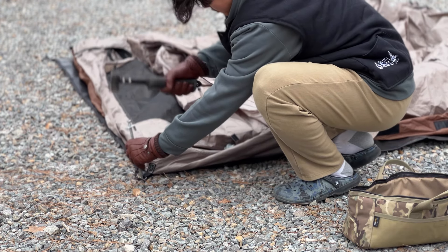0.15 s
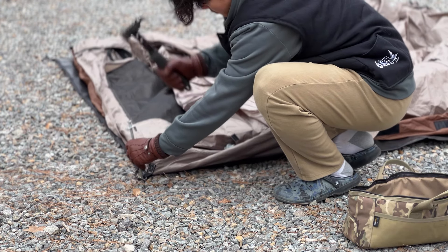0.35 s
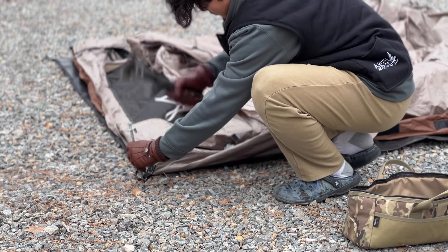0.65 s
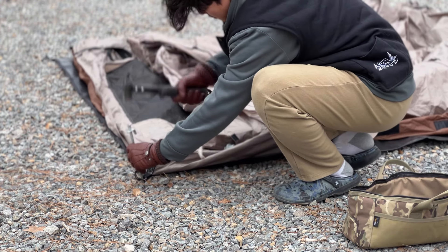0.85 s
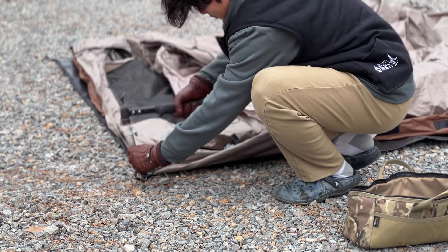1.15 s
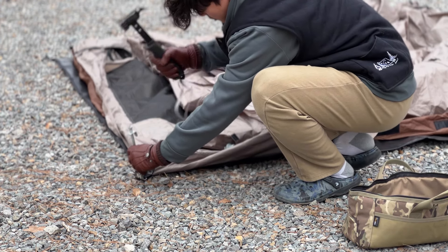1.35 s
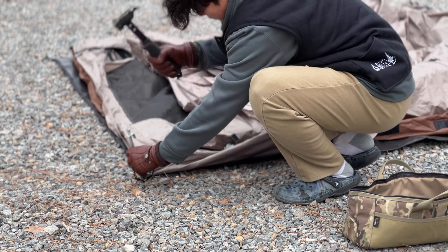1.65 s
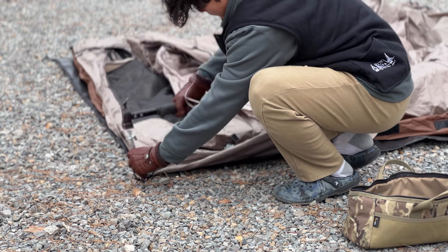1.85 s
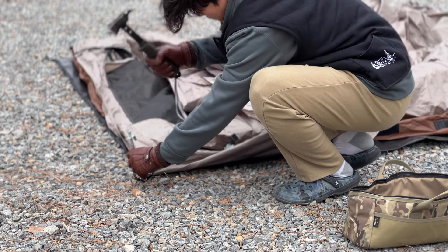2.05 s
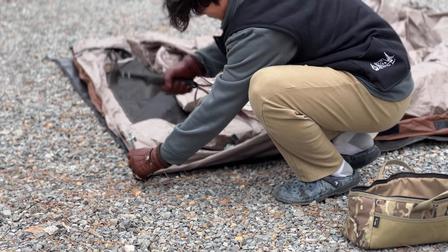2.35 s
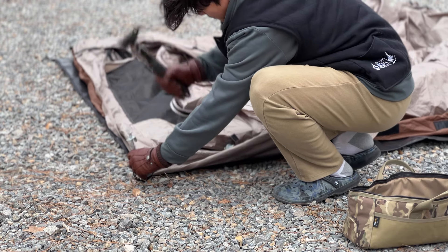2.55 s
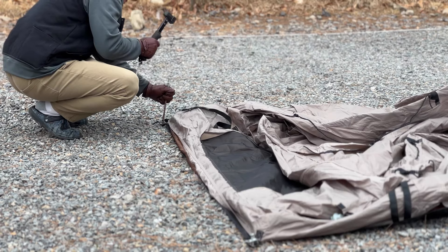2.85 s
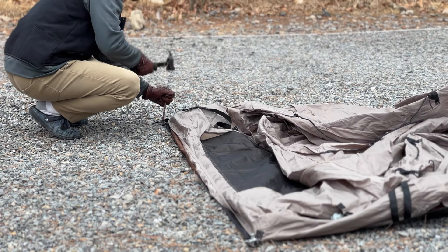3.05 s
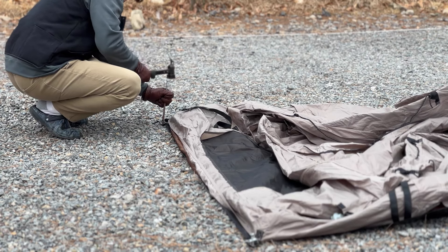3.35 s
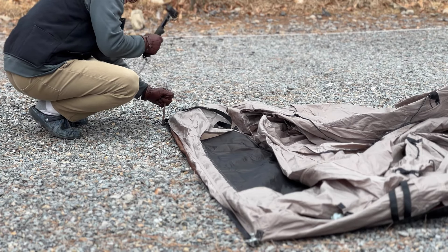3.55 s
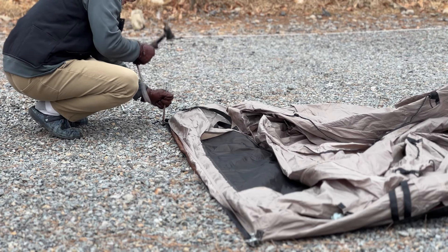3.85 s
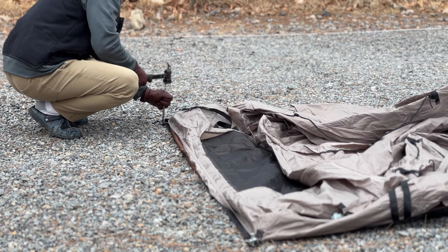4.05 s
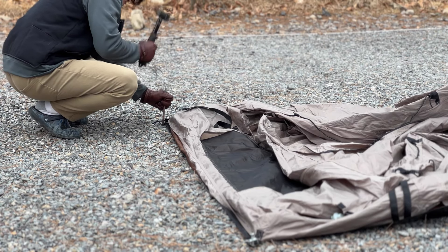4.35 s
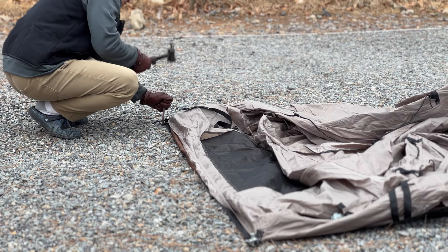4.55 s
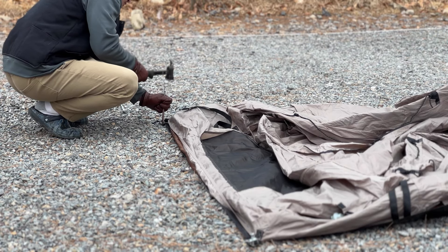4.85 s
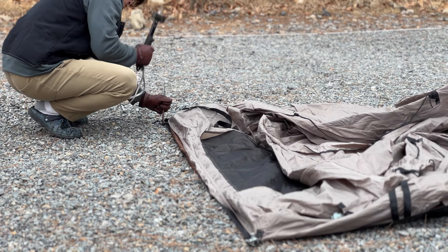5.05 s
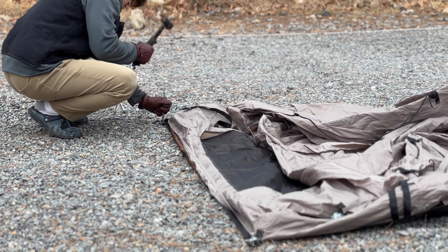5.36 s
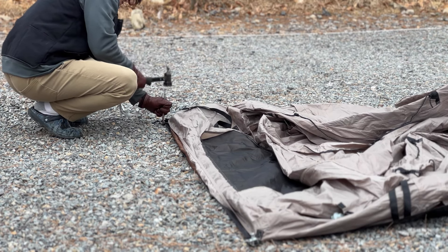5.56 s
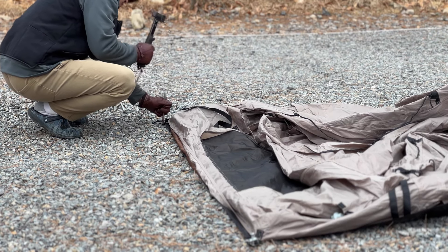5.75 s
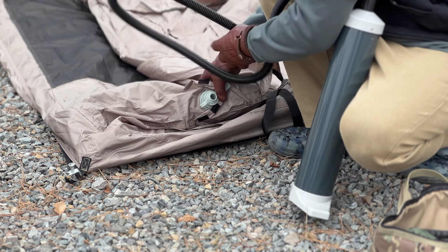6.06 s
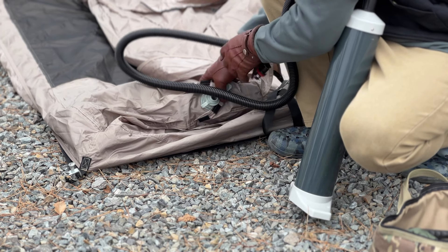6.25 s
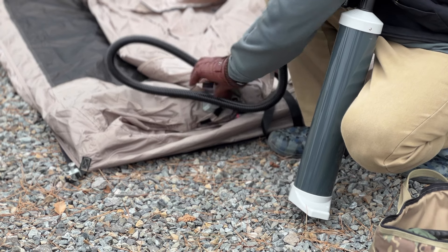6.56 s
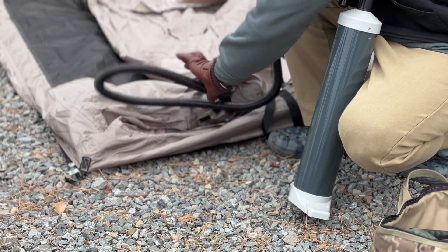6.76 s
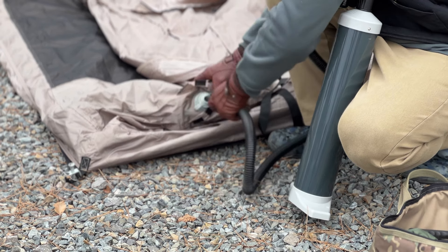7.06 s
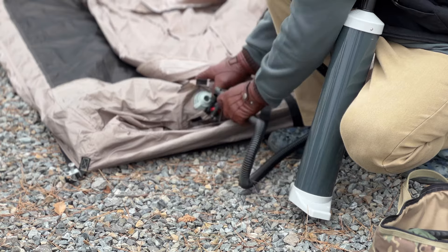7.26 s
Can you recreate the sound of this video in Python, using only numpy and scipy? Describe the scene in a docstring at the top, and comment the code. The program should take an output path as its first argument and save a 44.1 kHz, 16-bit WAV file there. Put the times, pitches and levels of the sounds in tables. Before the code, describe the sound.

Outdoors, sharp metallic hammer strikes on a tent peg repeat about every third of a second, then stop abruptly for crinkling cloth and hose ticks.

```python
"""Open gravel near a wall and trees: a hammer drives a steel tent peg in two shots, hard-cut together;
in a third shot a ribbed pump hose is handled on tent cloth.
Blows are shaped noise and damped sines, with the head's ring, a ground thud and noise echoes.
Cloth is random snaps, filtered noise and ticks; wind is filtered noise and single pressure swings.
Far birds are gliding sines and rough pulse trains; wind and air run on through all three shots."""
import sys
import numpy as np
from scipy import signal
from scipy.fft import rfft, irfft
from scipy.io import wavfile
from scipy.ndimage import uniform_filter1d

SR = 44100
rng = np.random.default_rng(int(sys.argv[2]) if len(sys.argv) > 2 else 0)


def log_audio(samples):
    """Write samples as a 16-bit WAV file to the path given in sys.argv[1]."""
    # one column per channel
    frames = np.atleast_2d(samples).T
    # limit to full scale, then quantise
    limited = np.clip(frames, -1, 1)
    pcm = np.round(limited * 32767).astype(np.int16)
    wavfile.write(sys.argv[1], SR, pcm)


N = 326781

# All dB in the tables are relative: mix levels and filters act later.
# Hard cuts between the shots. Each entry: time in seconds.
CUTS_S = [2.688, 5.95]

# Open air and port spectra. Each row: frequency in Hz, density in dB per Hz.
AIR_SPECTRUM = [(30, 3.5), (100, 1.5), (300, -7), (700, -7.5), (1400, -18.5), (3000, -28), (6000, -46.5),
                (10000, -44.5), (16000, -49.5)]
# Phase lead of the left microphone port over the right. Each row: frequency in Hz, lead in radians.
PORT_LEAD = [(30, 0), (1900, 0.05), (3200, 0.68), (6400, 0.15), (8300, 0.45), (9300, -1.9), (10300, -3.2),
             (12000, -6.2), (13800, -9.4), (15500, -12.5)]

# Whistles of small birds. Each row: start in seconds, length in seconds, start pitch in Hz,
# end pitch in Hz, level in dB.
WHISTLES = [(0.452, 0.3, 1647, 1557, -84), (3.222, 0.061, 7000, 6460, -89), (3.408, 0.073, 4000, 3680, -79),
            (3.609, 0.07, 4350, 3570, -85.5), (3.95, 0.072, 2630, 2530, -88.5),
            (4.379, 0.096, 2600, 2555, -88), (4.731, 0.093, 2600, 2530, -87),
            (5.085, 0.11, 2570, 2560, -83.5), (5.755, 0.07, 4210, 3580, -88.5),
            (5.783, 0.09, 2564, 2630, -87.5), (6.394, 0.13, 4940, 4560, -89),
            (6.486, 0.06, 8600, 7100, -89)]
# Harsh calls of a far bird. Each row: start in seconds, length in seconds, start pitch in Hz,
# top of the pitch arch in Hz, level in dB, roughness 0-1, power that lifts the upper harmonics.
CAWS = [(2.943, 0.046, 706, 1150, -68, 0.38, 2.4), (4.241, .035, 944, 1070, -68, 0.42, 2.4),
        (5.287, 0.045, 736, 866, -67, 0.4, 1.0), (5.319, 0.063, 697, 767, -59.5, 0.31, 0.25),
        (5.392, 0.064, 613, 660, -68, 0.3, 0.082)]
# Throat of the far bird. Each row: frequency in Hz, gain in dB.
THROAT = [(500, -12), (760, -3), (1050, -14), (1400, -7), (1850, -12), (2300, 2), (2700, -11), (3600, -23),
          (4250, -16), (5000, -36)]

# Wind rumble spectrum. Each row: frequency in Hz, density in dB per Hz.
RUMBLE_SPECTRUM = [(15, -45), (25, -23), (35, -14), (50, -2), (70, 0), (110, -3), (180, -16), (300, -26.5),
                   (700, -52), (2000, -93.5)]
# Strength of the breeze. Each row: time in seconds, rumble in dB.
BREEZE = [(0, -65), (.45, -62.5), (.9, -54.5), (2.5, -55.5), (2.8, -52), (4.4, -53), (5.3, -47.5),
          (5.8, -51.5), (6.3, -46.5), (6.9, -54.5), (7.41, -44.5)]
# Gusts that swell the rumble. Each row: middle in seconds, rumble in dB.
GUSTS = [(2.14, -38), (2.301, -45.5), (2.8, -43.5), (3.069, -38.5), (3.25, -41.5), (3.58, -43.5),
         (3.849, -40.5), (4.61, -40.5), (4.94, -37.5), (6.55, -44), (7.029, -45)]
# Spells full of small eddies. Each row: start in seconds, length in seconds, flutter in dB.
SPELLS = [(2.7, 0.86, -53.5), (3.965, 0.29, -51), (4.763, 0.85, -54), (5.953, 0.48, -51.5),
          (6.662, 0.17, -55), (7.128, 0.17, -46.5)]
# Single strong buffets. Each row: middle in seconds, peak in dB, frequency in Hz.
BUFFETS = [(2.309, -35, 236), (2.722, -39, 525), (2.85, -41.5, 490), (3.231, -34.5, 216),
           (3.275, -40.5, 530), (3.409, -40, 495), (3.553, -34.5, 407), (3.569, -32.5, 180),
           (3.831, -28, 211), (3.856, -39, 370), (4.117, -39, 443), (4.594, -35, 187), (4.903, -26.5, 262),
           (4.941, -32.5, 158), (5.13, -30.5, 580), (5.287, -31, 171), (5.647, -35.5, 203),
           (5.97, -37, 620), (6.23, -32.5, 433), (6.436, -38.5, 590), (6.715, -37, 473),
           (6.866, -41.5, 595), (7.149, -37, 416), (7.305, -37, 554)]
GUST_WIDTH_S, SPELL_RISE_S, SPELL_FALL_S = 0.035, 0.01, 0.055
# Small eddies outgrow the rumble: EDDY_DB at a breeze of BREEZE_REF_DB, growth in dB per dB of breeze.
BREEZE_REF_DB, EDDY_DB, EDDY_GROWTH = -50, -61, 1.5

# Spectra of crinkle and ticks, and of the weave's swish. Each row: frequency in Hz, density in dB per Hz.
CLOTH_SPECTRUM = [(400, 8), (1200, 4), (3200, 6), (4500, 1), (7500, -0.5), (9500, -8), (12000, -7.5),
                  (16000, -17)]
SWISH_SPECTRUM = [(2000, -22), (6000, -8.5), (9500, -4.5), (11500, -0.5), (13000, -7), (16000, -10)]
# Moves of the hands over the cloth. Each row: start in seconds, length in seconds, crinkle in dB, swish in dB.
MOVES = [(6.163, 0.07, -70.5, -71), (6.286, 0.047, -67.5, -83), (6.555, 0.056, -72, -80),
         (6.661, .08, -77.5, -89), (6.956, 0.094, -74, -62), (7.068, 0.13, -69, -81),
         (7.326, 0.027, -72, -69.5)]
# Ticks of the ribbed hose against the cloth. Each row: start in seconds, level in dB.
SCUFFS = [(5.989, -63.5), (6.0543, -59.5), (6.096, -69), (6.2113, -55.5), (6.308, -60.5), (6.376, -62.5),
          (6.405, -62), (6.4515, -58.5), (6.592, -57.5), (6.787, -58), (6.7988, -55), (6.973, -53),
          (6.995, -55), (7.1318, -53.5), (7.363, -56)]
MOVE_RISE_S, MOVE_FALL_S, SCUFF_T60_S = 0.014, 0.013, 0.035
RESTING_DB = -78.5  # crinkle between moves

# Hammer blows. Each row: start in seconds, crack in dB, crack treble in dB, peg in dB, ground thud in dB,
# low ring in dB, high ring in dB, knock in Hz, looseness of grip as a factor on the low ring's length.
BLOWS = [(-0.011, -39, -41.5, -41.5, -49.5, -36, -63, 1600, 0.87),
         (0.3084, -33.5, -39, -37, -42, -38, -40.5, 2710, 0.89),
         (0.672, -33.5, -39.5, -37.5, -37, -32, -41.5, 2770, 0.91),
         (1.05, -36, -38, -39, -35, -41, -45.5, 2830, 1.24),
         (1.408, -34.5, -37, -35, -38, -32, -40.5, 2600, 0.88),
         (1.7836, -36, -34.5, -31.5, -38, -38, -38.5, 1082, 0.94),
         (2.1437, -34, -38, -31.5, -33.5, -40, -54, 1134, 1.48),
         (2.4999, -35.5, -35.5, -30, -33.5, -37.5, -52.5, 1035, 1.43),
         (2.658, -38, -45.5, -41, -56, -69, -52, 1633, 0.82),
         (2.9942, -38.5, -45.5, -35.5, -43, -50, -50, 1750, 1.17),
         (3.3475, -39.5, -44.5, -43.5, -62, -64.5, -57.5, 2130, 2.6),
         (3.7196, -40, -43.5, -37, -43, -43, -39, 915, 0.85),
         (4.0759, -39, -40.5, -40, -44.5, -56.5, -46, 1733, 1.53),
         (4.4614, -40, -43, -41.5, -49, -50.5, -39.5, 1180, 1.04),
         (4.809, -40.5, -43, -40.5, -39.5, -45, -42, 1855, 0.8),
         (5.167, -41, -38.5, -37.5, -41, -43.5, -49.5, 1370, 0.88),
         (5.5287, -41, -39.5, -40.5, -42, -64, -46.5, 2230, 1.17),
         (5.886, -39.5, -41, -39.5, -40.5, -42.5, -52, 1824, 0.88)]
# Steel modes of the hammer head. Each row: frequency in Hz, level in dB, T60 in seconds,
# ring it follows (0 low, 1 high).
HAMMER_MODES = [(3510, -0.5, 0.29, 0), (3512, -19.5, .55, 0), (4890, -15.5, 0.16, 0), (10875, 4, 0.23, 1)]
# Modes of the peg, damped by glove and gravel. Each row: frequency in Hz, level in dB, T60 in seconds.
PEG_MODES = [(6442, 10, 0.016), (6770, -20.5, 0.03), (5980, -3.5, 0.033), (6350, -26.5, 0.033)]
# Spectra of the crack, its treble, the wall's slap and the trees' wash.
# Each row: frequency in Hz, density in dB per Hz.
CRACK_SPECTRUM = [(300, -26.5), (550, -4.5), (850, -3.5), (1500, -2.5), (2100, -1), (2800, 0), (4300, -5),
                  (5500, -5.5), (7000, -10.5), (9000, -40)]
TREBLE_SPECTRUM = [(4000, -35), (7000, 0.5), (8000, -4), (8800, 6), (10000, -2), (11000, -1), (12500, -7.5),
                   (13800, -4), (15400, -6), (16500, -22.5)]
WALL_SPECTRUM = [(500, -21.5), (2500, -17), (5000, -18), (6400, 9), (7300, -1), (8500, 0), (9800, -18),
                 (12000, -16.5), (16000, -27)]
TREES_SPECTRUM = [(200, -10), (1000, -11.5), (3000, -8), (4500, -6.5), (5800, -3.5), (6500, 7), (7000, -1),
                  (8600, 1), (9800, -9), (12000, -20), (15400, -15), (16500, -29.5)]
KNOCK_DB = -3.5  # re crack
LIFT_S, SOUND_M_PER_S = 0.09, 343  # time constant of the arm's lift; speed of sound
GROUND_DB = -20.5  # the ring's reflection in the gravel
FAR_ECHO_RATIO, FAR_ECHO_DB = 1.8, -6.5  # farther surface: delay and level re the wall's echo


def amp(db):
    """Decibels to gain."""
    return 10 ** (np.asarray(db) / 20)


def unit(x):
    """Scales to rms 1."""
    return x / np.sqrt(np.mean(x ** 2) + 1e-20)


def read(points, hz):
    """Interpolates a spectrum on a log-frequency axis."""
    f, value = np.transpose(points)
    return np.interp(np.log(hz + 1), np.log(f + 1), value)


def level(rows):
    """A dB curve as a gain for every sample."""
    return amp(np.interp(np.arange(N) / SR, *np.transpose(rows)))


def seconds(length_s):
    """Time axis of a short sound."""
    return np.arange(int(length_s * SR)) / SR


def add(mix, start_s, sound):
    """Mixes a sound in, trimming what lies outside the mix."""
    at = round(start_s * SR)
    sound = sound[max(-at, 0):]
    part = mix[max(at, 0):][:len(sound)]
    part += sound[:len(part)]


def colour(x, points, size=2048):
    """Causal minimum-phase filter with the given spectrum."""
    log_gain = np.log(amp(read(points, abs(np.fft.fftfreq(size, 1 / SR)))))
    taps = np.fft.ifft(np.exp(signal.hilbert(log_gain).conj())).real[:size // 2]
    return signal.oaconvolve(x, taps)[:len(x)]


def burst(x, db, length_s):
    """Gives a short sound the energy of an rms of db held for length_s."""
    return amp(db) * x * np.sqrt(length_s * SR / (np.sum(x ** 2) + 1e-20))


def held(start_s, length_s, rise_s, fall_s):
    """Envelope: linear rise, hold, exponential fall after length_s."""
    t = np.arange(N) / SR - start_s
    return np.clip(t / rise_s, 0, 1) * np.exp(-np.maximum(t - length_s, 0) / fall_s)


def puff(hz, cycles, order=6):
    """Pressure swing of about a cycle: a sine of random phase under a Gaussian, centred in order periods."""
    turns = hz * seconds(order / hz) - order / 2
    return np.exp(-(turns / cycles) ** 2) * np.sin(2 * np.pi * (turns + rng.random()))


def woods(x, t60_s, wet_db):
    """Trunks and branches scatter a thin, late tail: sparse noise taps that swell, then decay."""
    t = seconds(0.91)
    taps = rng.standard_normal(len(t)) * (rng.random(len(t)) < 5000 / SR)
    taps *= amp(-60 * t / t60_s) * (1 - np.exp(-t / 0.043))
    return amp(wet_db) * signal.oaconvolve(x, taps / np.linalg.norm(taps))[:N]


def air(db):
    """Steady hush of the open air: filtered noise."""
    return amp(db) * unit(colour(rng.standard_normal(N), AIR_SPECTRUM))


def whistles():
    """Thin whistles: sines gliding geometrically in pitch."""
    thin = np.zeros(N)
    for start_s, length_s, from_hz, to_hz, db in WHISTLES:
        hz = np.geomspace(from_hz, to_hz, int(length_s * SR))
        tone = np.sin(2 * np.pi * np.cumsum(hz) / SR)
        add(thin, start_s, amp(db) * unit(tone * signal.windows.tukey(len(hz), 0.6)))
    return thin


def caws():
    """Harsh calls: six harmonics on an arching, jittered pitch, roughened by noise, through a throat filter."""
    harsh = np.zeros(N)
    for start_s, length_s, from_hz, top_hz, db, rough, shrill in CAWS:
        hz = from_hz + (top_hz - from_hz) * np.sin(np.linspace(0, 2, int(length_s * SR)))
        jitter, rasp = rng.standard_normal((2, len(hz)))
        turns = np.cumsum(hz * (1 + rough * uniform_filter1d(jitter, size=120))) / SR
        pulses = unit(sum(k ** shrill * np.cos(2 * np.pi * k * turns) for k in range(1, 7)))
        call = colour(pulses * (1 + rough * rasp), THROAT)
        add(harsh, start_s, amp(db) * unit(call * signal.windows.tukey(len(hz), 0.6)))
    return harsh


def birds():
    """Whistles and harsh calls, blurred by the woods."""
    thin, harsh = whistles(), caws()
    return thin + woods(thin, 0.4, wet_db=-4) + harsh + woods(harsh, 0.6, wet_db=-2)


def wind_rumble(breeze):
    """Low noise whose swells follow breeze and gusts."""
    now = np.arange(N) / SR
    gusts = sum(amp(db) * np.exp(-((now - mid_s) / GUST_WIDTH_S) ** 2) for mid_s, db in GUSTS)
    rumble = colour(rng.standard_normal(N), RUMBLE_SPECTRUM, size=8192)
    # partly evens out chance swells
    evened = rumble / (uniform_filter1d(rumble ** 2, size=2200) + 1e-12) ** 0.11
    return unit(evened) * np.hypot(breeze, gusts)


def wind_flutter(breeze):
    """Small eddies: random puffs in twelve sizes, denser in level during spells and stronger breeze."""
    spells = sum(amp(db) * held(start_s, length_s, SPELL_RISE_S, SPELL_FALL_S)
                 for start_s, length_s, db in SPELLS)
    turbulence = np.hypot(amp(EDDY_DB) * (breeze / amp(BREEZE_REF_DB)) ** EDDY_GROWTH, spells)
    flutter = np.zeros(N)
    for hz in np.geomspace(160, 620, num=12):
        # 20 eddies a second per size on average, levels spread exponentially in dB
        eddies = (rng.random(N) < 20 / SR) * amp(4.6 * np.minimum(rng.exponential(1, N), 3.2))
        flutter += signal.oaconvolve(eddies, puff(hz, cycles=0.58), "same") * hz ** -0.42
    return unit(flutter) * turbulence


def wind_buffets():
    """Single strong pressure swings on the microphone."""
    buffets = np.zeros(N)
    for mid_s, db, hz in BUFFETS:
        swing = amp(db) * puff(hz, cycles=0.52)
        add(buffets, mid_s - len(swing) / SR / 2, swing)
    return buffets


def wind(rumble_db, flutter_db, buffet_db):
    """Air turbulence on the microphone: rumble, flutter of small eddies, single buffets."""
    breeze = level(BREEZE)
    steady = amp(rumble_db) * wind_rumble(breeze) + amp(flutter_db) * wind_flutter(breeze)
    return steady + amp(buffet_db) * wind_buffets()


def hose_ticks(scuff_db):
    """Ribbed hose ticks on the cloth: decaying noise."""
    ticks = np.zeros(N)
    t = seconds(0.15)
    for start_s, db in SCUFFS:
        add(ticks, start_s, amp(db + scuff_db - 60 * t / SCUFF_T60_S) * rng.standard_normal(len(t)))
    return ticks


def cloth(rustle_db, swish_db, scuff_db):
    """Tent cloth crinkles in tiny snaps, its weave swishes under the glove, the hose ticks against it."""
    snaps, folding, sliding = np.zeros((3, N))
    for start_s, length_s, fold_db, slide_db in MOVES:
        move = held(start_s, length_s, MOVE_RISE_S, MOVE_FALL_S)
        folding += amp(fold_db) * move
        sliding += amp(slide_db) * move
    for hz in np.geomspace(1800, 9500, num=14):
        folds = (rng.random(N) < 300 / SR) * amp(3.6 * np.minimum(rng.exponential(1, N), 4))
        snaps += signal.oaconvolve(folds, puff(hz, cycles=1.9), "same") * hz ** 0.56
    # the glove catches and slides on the weave every few ms
    catches = amp(5.5 * unit(uniform_filter1d(rng.standard_normal(N), size=300)))
    crinkle = amp(rustle_db) * unit(snaps * catches) * (amp(RESTING_DB) + folding)
    crinkle_and_ticks = colour(crinkle + hose_ticks(scuff_db), CLOTH_SPECTRUM)
    swish = amp(swish_db) * unit(colour(rng.standard_normal(N) * catches, SWISH_SPECTRUM)) * sliding
    return (crinkle_and_ticks + swish) * (np.arange(N) / SR > CUTS_S[1])


def scatter(t60_s, echo_s, echo_db, wet_db):
    """Echo of one blow: a bright slap off the wall, a weaker one from farther off, a soft wash from the trees."""
    t = seconds(0.36)
    late = np.maximum([t - echo_s, t - FAR_ECHO_RATIO * echo_s], 0)
    echoes = amp([0, FAR_ECHO_DB]) @ (late * np.exp(-late / 0.0012))
    slap = colour(rng.standard_normal(len(t)) * echoes, WALL_SPECTRUM)
    decay = amp(-60 * t / t60_s) * (1 - np.exp(-t / 0.0026))
    wash = colour(rng.standard_normal(len(t)) * decay, TREES_SPECTRUM)
    return burst(slap, echo_db, 0.01) + burst(wash, wet_db, 0.01)


def ring(low_db, high_db, looseness, lift_m_per_s):
    """Head rings as it is lifted: pitch rises a little and beats with its reflection in the ground."""
    t = seconds(0.62)
    risen_m = lift_m_per_s * rng.uniform(0.8, 1.2) * np.cumsum(np.tanh(t / LIFT_S)) / SR
    early_s = risen_m / SOUND_M_PER_S
    sound = np.zeros(len(t))
    # a tight grip damps the low modes and hardly touches the high ones
    for hz, db, t60_s, is_high in HAMMER_MODES:
        start_db, length_s = (high_db, t60_s) if round(is_high) else (low_db, t60_s * looseness)
        direct = np.sin(2 * np.pi * hz * (t + early_s))
        mirrored = amp(GROUND_DB) * np.sin(2 * np.pi * (hz * (t - 0.3 * early_s) + rng.random()))
        sound += amp(start_db + db - 60 * t / length_s) * (direct + mirrored)
    return np.sqrt(2) * sound * (1 - np.exp(-t / 0.00025))


def crack(t, crack_db, treble_db):
    """Sharp first contact; the peg then jerks through the stones for a few ms, and grit settles."""
    slip = 1.2 * np.exp(-t / 0.00095) + np.exp(-t / 0.0031) + 0.04 * np.exp(-t / 0.02)
    grit = rng.standard_normal((2, len(t))) * (1 - np.exp(-t / 0.00036)) * slip
    body = burst(colour(grit[0], CRACK_SPECTRUM), crack_db, 0.018)
    return body + burst(colour(grit[1], TREBLE_SPECTRUM), treble_db, 0.018)


def clank(t, peg_db):
    """Short ring of the damped peg, its modes detuned at random each blow."""
    modes = sum(amp(db - 60 * t / t60_s) * np.sin(2 * np.pi * (hz + 45 * rng.standard_normal()) * t)
                for hz, db, t60_s in PEG_MODES)
    return burst(modes * (1 - np.exp(-t / 0.0006)), peg_db, 0.013)


def knock(t, db, knock_hz):
    """Stones gripping the tip knock at a pitch of their own each blow."""
    return burst(np.sin(2 * np.pi * knock_hz * t) * t * np.exp(-t / 0.0014), db, 0.011)


def thud(t, db):
    """Loose ground carries high tones fastest, so the thud falls in pitch."""
    hz = 150 + 750 * np.exp(-t / 0.0027)
    swing = np.sin(2 * np.pi * np.cumsum(hz) / SR) * t ** 2 * np.exp(-t / 0.003)
    return burst(swing, db, 0.015)


def blow(crack_db, treble_db, peg_db, thud_db, knock_hz):
    """Steel meets steel: crack, clank of the peg, knock and thud."""
    t = seconds(0.2)
    steel = crack(t, crack_db, treble_db) + clank(t, peg_db)
    return steel + knock(t, crack_db + KNOCK_DB, knock_hz) + thud(t, thud_db)


def hammering(start_s, end_s, echo_s, echo_db, wet_db, ring_wet_db, lift_m_per_s):
    """Blows, rings and echoes of one shot, gated hard between two cuts."""
    strikes, rings = np.zeros((2, N))
    for s, crack_db, treble_db, peg_db, thud_db, low_db, high_db, knock_hz, looseness in BLOWS:
        # a blow just ahead of a cut belongs to the next shot
        if start_s - 0.05 < s < end_s - 0.05:
            add(strikes, s, blow(crack_db, treble_db, peg_db, thud_db, knock_hz))
            strength = amp(np.mean([crack_db, treble_db, peg_db]))
            add(strikes, s, strength * scatter(0.42, echo_s, echo_db, wet_db))
            add(rings, s, ring(low_db, high_db, looseness, lift_m_per_s))
    # the ring returns from the trees and beats against the direct ring as it fades
    lingering = woods(rings, 0.48, ring_wet_db)
    now = np.arange(N) / SR
    return (strikes + rings + lingering) * ((now >= start_s) & (now < end_s))


def ports(x):
    """Two microphone ports: opposite half phase leads that turn smoothly with frequency."""
    lead = read(PORT_LEAD, np.fft.rfftfreq(2 * N, 1 / SR))
    lead = uniform_filter1d(uniform_filter1d(lead, size=9000), size=9000)
    return irfft(rfft(x, 2 * N) * np.exp(0.5j * np.array([lead, -lead])))[:, :N]


def scene():
    """Three shots in a row, under wind and air that differ a little between the ports."""
    backdrop = air(-65.5) + birds()
    handling = cloth(rustle_db=-7.5, swish_db=-2, scuff_db=-2.0)
    first = hammering(0, CUTS_S[0], echo_s=0.0312, echo_db=-14.5, wet_db=-15.0,
                      ring_wet_db=-22.5, lift_m_per_s=1.2)
    second = hammering(CUTS_S[0], CUTS_S[1], echo_s=0.0275, echo_db=-4.5, wet_db=-9.5,
                       ring_wet_db=-14.5, lift_m_per_s=0.686)
    sounds = ports(backdrop + handling + first + second)
    common = wind(rumble_db=1, flutter_db=2.0, buffet_db=1.5)
    apart = wind(rumble_db=-13.0, flutter_db=-8, buffet_db=-11.5) + air(-69)
    return sounds + common + np.array([apart, -apart])


def record(dry):
    """The recorder's bass cut at 30 Hz and band limit at 16.9 kHz."""
    lean = signal.sosfilt(signal.butter(2, 30, "highpass", fs=SR, output="sos"), dry)
    edge = signal.firwin(511, 16900, window=("kaiser", 9), fs=SR)
    return signal.oaconvolve(lean, edge[None], "same", axes=1)


dry = scene()
out = record(dry)
log_audio(out)
```